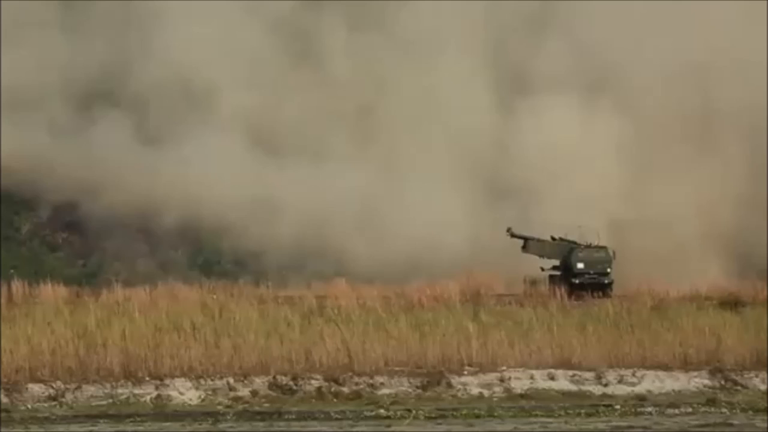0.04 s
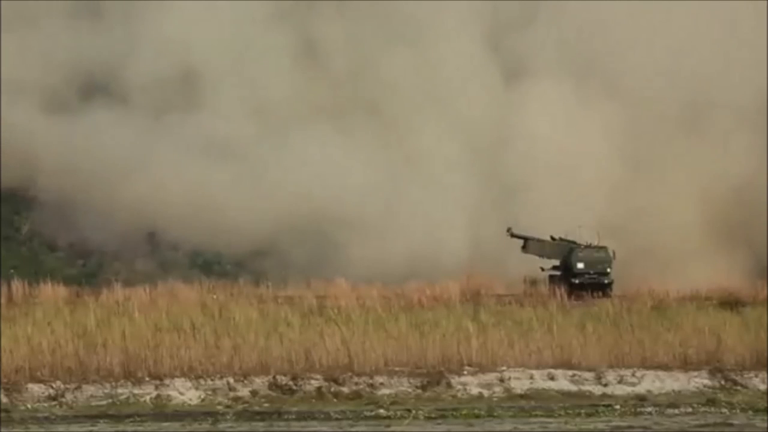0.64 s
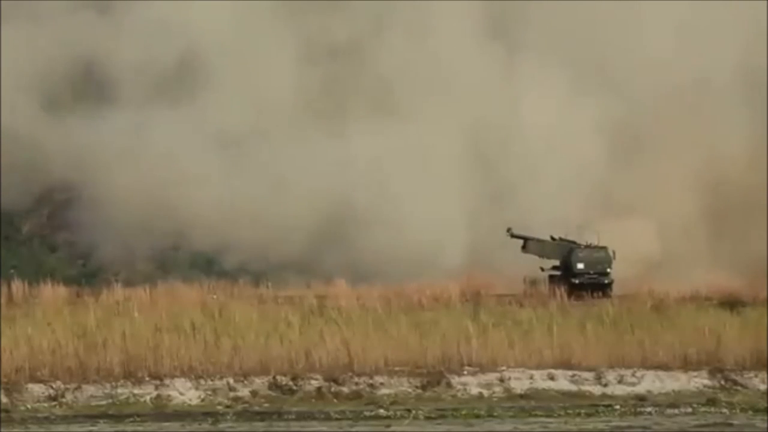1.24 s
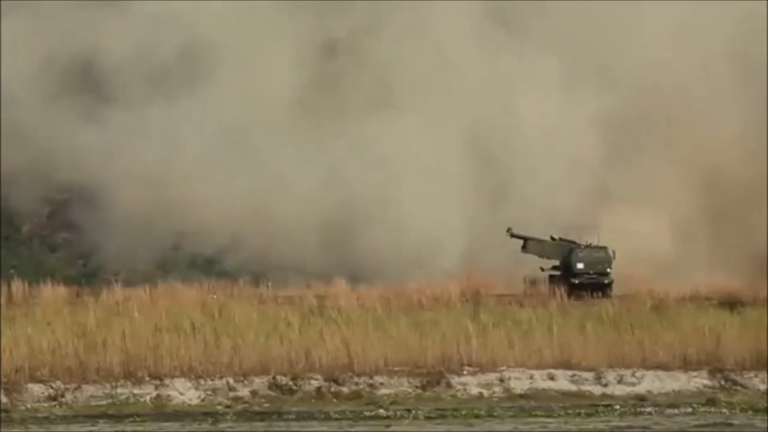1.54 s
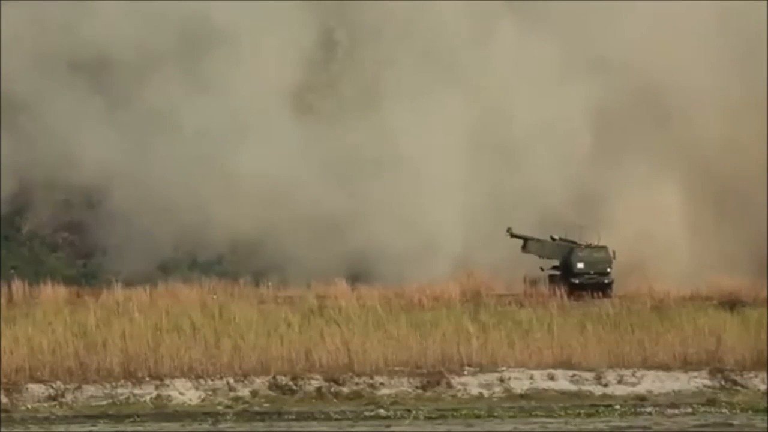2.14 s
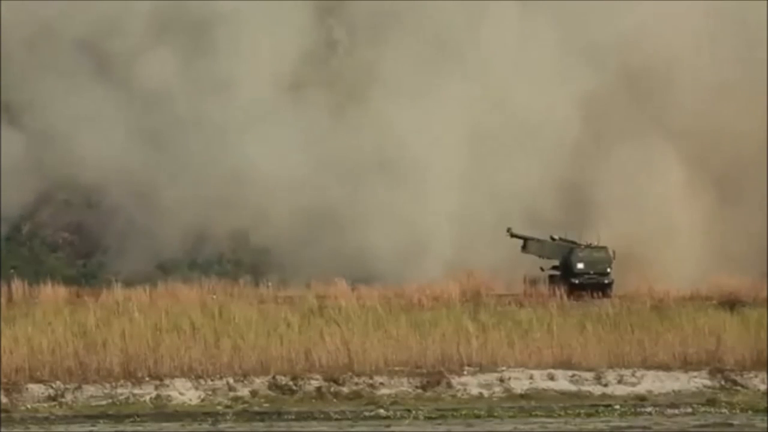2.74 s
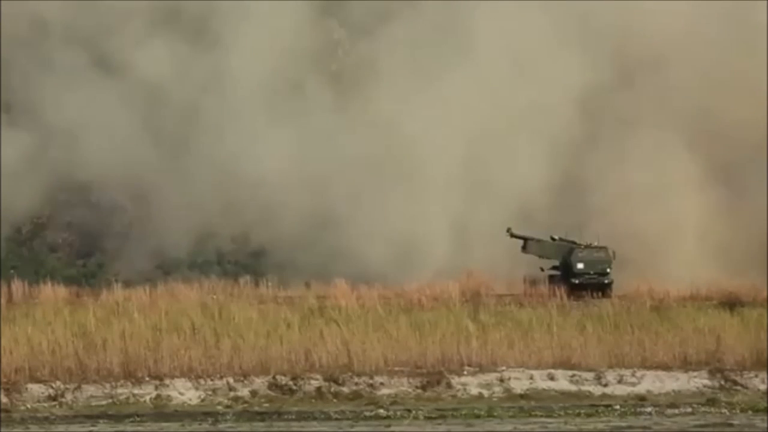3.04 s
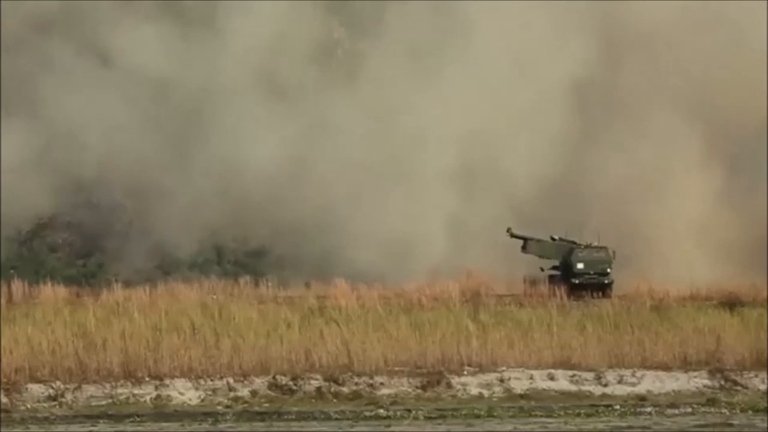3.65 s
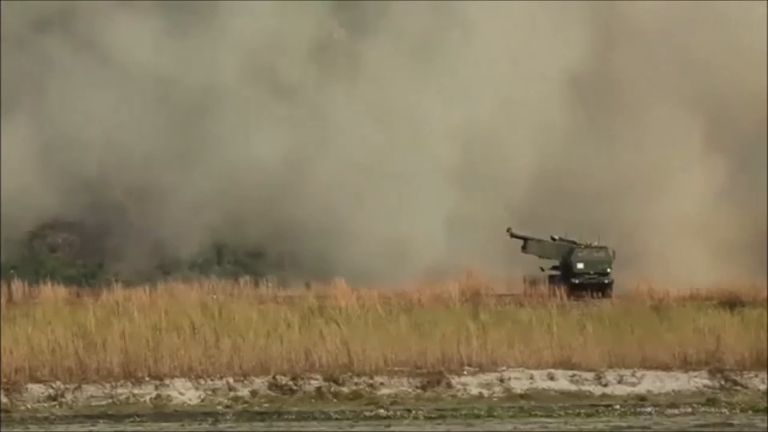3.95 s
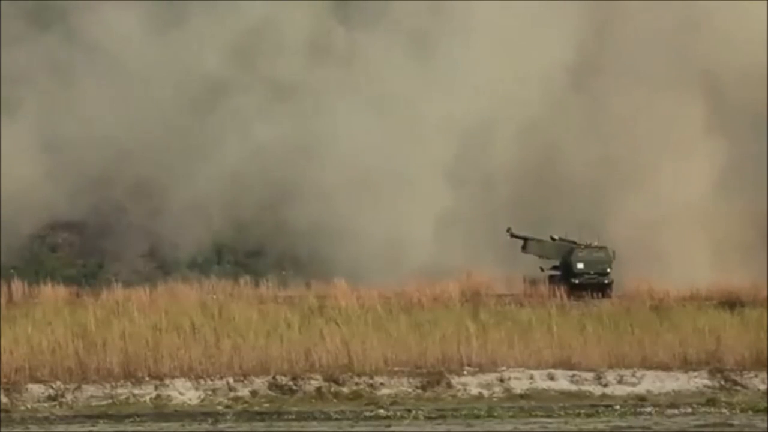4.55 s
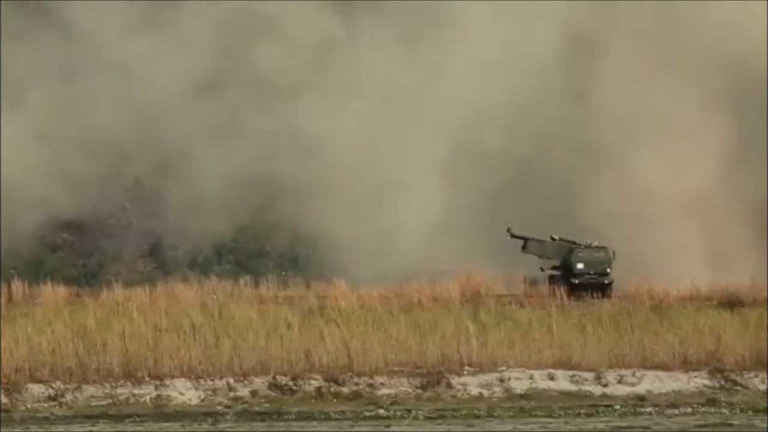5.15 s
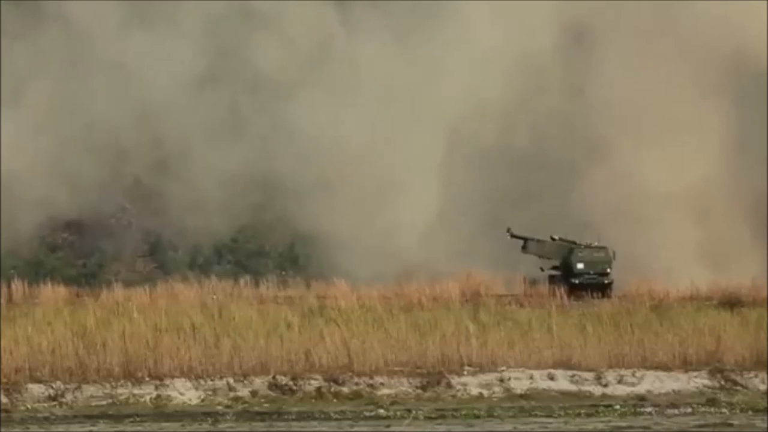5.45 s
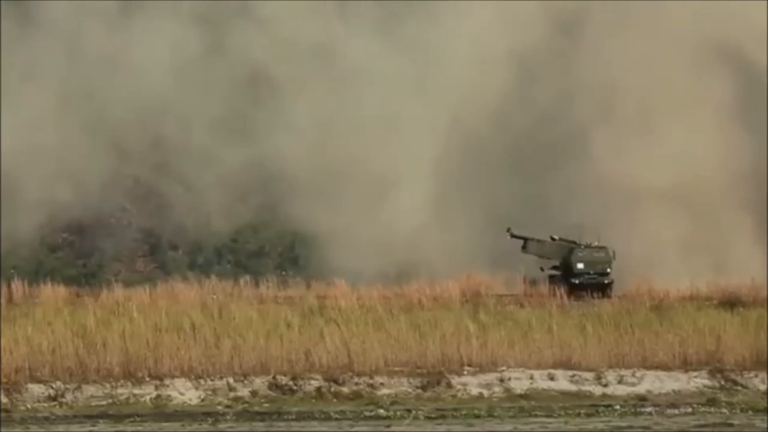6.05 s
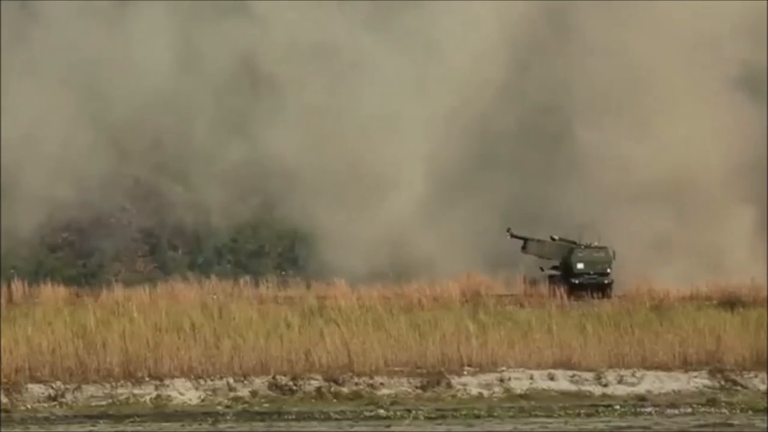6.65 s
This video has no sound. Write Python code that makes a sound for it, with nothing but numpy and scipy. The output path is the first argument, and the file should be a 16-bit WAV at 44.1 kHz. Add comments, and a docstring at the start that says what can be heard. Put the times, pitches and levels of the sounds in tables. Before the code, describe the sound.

A rocket launches with a sudden bang and a loud, crackling roar that dulls and fades over a quiet field.

```python
"""A bang, then a crackling jet roar that overloads the microphone: a truck fires a rocket over a field.
The roar is turbulent noise plus small shocks. As the rocket climbs, its ground reflection sweeps a comb
of resonances downward; distance dulls the roar and it fades in surges.
Beneath it lie the hush of the field, an idling engine and a few faint birds."""
import sys
import numpy as np
from scipy import signal
from scipy.fft import rfft, irfft, next_fast_len
from scipy.io import wavfile
from scipy.ndimage import uniform_filter1d, map_coordinates

SR = 44100
rng = np.random.default_rng(int(sys.argv[2]) if len(sys.argv) > 2 else 0)


def generate_wav(sig):
    """Save sig (samples, or channels by samples) to the path in sys.argv[1] as 16-bit PCM at SR."""
    pcm = np.round(np.clip(np.atleast_2d(sig).T, -1, 1) * 32767).astype(np.int16)
    wavfile.write(sys.argv[1], SR, pcm)


N = 300188
IGNITION_S, FAR_S = .321, 2.3  # FAR_S: time scale from near to far sound

# shock packets carried to the ground by the air: centre t/s, half length/s, treble boost/dB, crackle/dB
SURGES = [(0.367, 0.027, -1, -33), (0.661, .11, 2.5, -51), (1.047, 0.033, 2, -42), (1.683, 0.074, 4.5, -38),
          (1.809, 0.033, 1, -39), (1.934, 0.055, 3, -36.5), (2.06, 0.036, 3, -38.5),
          (2.136, 0.036, 7.5, -38.5), (2.284, 0.031, 6, -45), (2.37, 0.037, 3.5, -36.5),
          (2.447, 0.016, 2.5, -46), (2.528, 0.015, 5.5, -42), (2.576, 0.023, 3.5, -45.5),
          (2.754, 0.04, 14.5, -31), (2.852, 0.043, 7.5, -43), (2.977, 0.036, 9, -37),
          (3.094, 0.015, 4.5, -56), (3.184, 0.033, 5, -36), (3.3, 0.03, 8, -33.5), (3.592, 0.037, 3, -39.5),
          (3.655, 0.013, 2, -50), (3.78, 0.032, 5.5, -46), (3.848, 0.021, 3, -50),
          (3.944, .025, 2.5, -45.5), (4.279, 0.05, 5.5, -34), (4.38, .02, 2.5, -47), (4.52, .02, 3, -48),
          (4.638, 0.04, 5.5, -48)]


def amp(db):
    """Decibels to gain."""
    return 10 ** (np.asarray(db) / 20)


def unit(x):
    """Scale to rms 1."""
    return x / np.sqrt(np.mean(x ** 2) + 1e-20)


def along(points, hz):
    """Interpolate (f/Hz, value) points on a log axis."""
    f, v = np.transpose(points)
    return np.interp(np.log(hz + 1), np.log(f + 1), v)


def curves(rows, t):
    """Each column after the first, interpolated at times t."""
    s, *cols = np.transpose(rows)
    return [np.interp(t, s, c) for c in cols]


def wobble(rate_hz, t):
    """Smooth random curve, rate_hz knots a second."""
    return map_coordinates(rng.standard_normal(4096), [t * rate_hz], mode="wrap")


def filtered(x, response):
    """Apply a zero-phase response(f/Hz)."""
    m = next_fast_len(len(x) + SR // 2)
    return irfft(rfft(x, m) * response(np.fft.rfftfreq(m, 1 / SR)), m)[:len(x)]


def band_noise(centre_hz, half_width_hz, order=2):
    """Noise band at rms 1."""
    white = rng.standard_normal(N)
    return unit(filtered(white, lambda hz: 1 / (1 + ((hz - centre_hz) / half_width_hz) ** order)))


def minimum_phase(x, spectrum, size=4096):
    """Colour x so that its pulses keep a steep front."""
    cepstrum = irfft(np.log(amp(along(spectrum, np.fft.rfftfreq(size, 1 / SR)))))
    cepstrum[1:size // 2] *= 2
    cepstrum[size // 2 + 1:] = 0
    return signal.fftconvolve(x, irfft(np.exp(rfft(cepstrum))))[:N]


def since(start_s):
    """Seconds since start_s per sample, 0 before it."""
    return np.maximum(np.arange(N) / SR - start_s, 0)


def field(hush_db, idle_hz, idle_db):
    """Outdoor hush and the hum of an idling engine."""
    # hush spectrum: f/Hz, relative level/dB
    spectrum = [(15, -40), (25, -26), (80, -17.5), (112, -14.5), (138, -3), (172, -11), (240, -9),
                (475, -11), (529, -10.5), (749, -12.5), (1760, -11.5), (2560, -23), (3010, -27),
                (3260, -31), (6540, -40), (15000, -57)]
    t = np.arange(N) / SR
    hush = unit(filtered(rng.standard_normal(N), lambda hz: amp(along(spectrum, hz))))
    hum = np.sin(2 * np.pi * idle_hz * t + .7 * wobble(4.4, t))
    return amp(hush_db + 0.51 * wobble(9.1, t)) * hush + amp(idle_db + 2 * wobble(5, t)) * hum


def birds(chatter_hz, chatter_db, trill_hz):
    """Narrow-band chatter, raspy chips, and thin whistles and trills that arch in pitch."""
    # chips from the grass: centre t/s, level/dB, half length/s, f/Hz
    chips = [(0.033, -47, 0.011, 1750), (.222, -48, 0.011, 1800), (0.256, -48, 0.01, 1800),
             (5.265, -46, .014, 1740), (5.462, -51, .008, 1920), (5.792, -52, 0.0082, 1850),
             (5.947, -48, .015, 1900), (6.078, -47, .011, 1750), (6.22, -44.5, 0.008, 1760),
             (6.245, -50, .015, 1780), (6.47, -53, .02, 1720), (6.565, -43, 0.006, 1790),
             (6.624, -50.5, .008, 1650), (6.715, -49.5, .014, 1740), (6.783, -48, 0.017, 1680)]
    # calls: t/s, length/s, top of arch f/Hz, level/dB, trill depth/0-1
    whistles = [(0.06, .075, 3080, -59, 0), (0.255, 0.1, 3120, -56, 0.1), (5.19, .15, 3660, -61, 0.7),
                (5.82, 0.18, 3920, -64, 1)]
    t = np.arange(N) / SR
    out = band_noise(chatter_hz, 210, order=4) * amp(chatter_db + 3.8 * wobble(30, t))
    rasp_rad = wobble(560, t)
    for s, db, half_s, hz in chips:
        on = np.abs(t - s) < 4 * half_s
        envelope = amp(db) * np.exp(-((t[on] - s) / half_s) ** 2)
        out[on] += envelope * np.sin(2 * np.pi * hz * t[on] + rasp_rad[on])
    for s, length_s, top_hz, db, depth in whistles:
        on = (t > s) & (t < s + length_s)
        progress = (t[on] - s) / length_s
        trill = depth * np.sin(2 * np.pi * trill_hz * (t[on] - s))
        arch = 1 - .08 * (2 * progress - 1) ** 2
        pitch_hz = top_hz * (arch + .05 * trill + .025 * depth * wobble(120, t[on]))
        envelope = amp(db + 7.7 * (trill - depth)) * np.sin(np.pi * progress)
        out[on] += envelope * np.sin(2 * np.pi * np.cumsum(pitch_hz) / SR)
    return out


def overload_hiss(hiss_db, hiss_hz, hold_s):
    """Even, bright hiss while the loud early roar overloads the microphone."""
    age = since(IGNITION_S)
    return amp(hiss_db) * band_noise(hiss_hz, 6000) * (age > 0) / (1 + (age / hold_s) ** 8)


def ignition(crack_db, crack_s, blast_db, blast_s, boom_db, boom_hz, boom_s):
    """The motor lights: a crack, one blast wave and a short, hollow boom."""
    age = since(IGNITION_S)
    crack = band_noise(1800, 1300) * np.exp(-age / crack_s)
    blast = (age / blast_s - 1) * np.exp(-age / blast_s)
    boom = band_noise(boom_hz, 49) * np.exp(-age / boom_s)
    return (age > 0) * (amp(crack_db) * crack + amp(blast_db) * blast + amp(boom_db) * boom)


def thumps(jet, gap_s, thump_s):
    """Low thumps, each briefly choking the roar in the overloaded microphone."""
    # thumps just after ignition: t/s, level/dB, f/Hz, gap depth/0-1
    hits = [(.38, -19, 170, 0.4), (.463, -11.5, 80, 0.7), (.577, -15, 150, 0.3)]
    for s, db, hz, depth in hits:
        age = since(s)
        gap = depth * (age > 0) * np.exp(-(age / gap_s) ** 4)
        thump = amp(db) * np.sin(2 * np.pi * hz * age) * np.exp(-age / thump_s)
        jet = jet * (1 - gap) + thump
    return jet


def snaps(front_s, decay_s):
    """Lone strong shocks: a steep front, then a swing back."""
    # shocks in the receding roar: t/s, level/dB
    shocks = [(2.961, -14), (2.973, -4)]
    out = np.zeros(N)
    for s, db in shocks:
        age = since(s)
        front = 1 - np.exp(-(age / front_s) ** 2)
        out += amp(db) * front * (age / decay_s - 1) * np.exp(-age / decay_s)
    return out


def receding(s, near, far):
    """Value at time s, moving from near to far; halfway FAR_S after ignition."""
    return far + (near - far) / (1 + (max(s - IGNITION_S, 0) / FAR_S) ** 12)


def swell(t, centre_s, half_s):
    """Surge envelope: abrupt close by, rounded far off."""
    steepness = receding(centre_s, near=7, far=2.8)
    return .5 ** (np.abs((t - centre_s) / half_s) ** steepness)


def crackle(shocks_per_s, log_width, spit_db, spit_hz):
    """Each surge brings shocks that rasp and spit, duller with distance."""
    t = np.arange(N) / SR
    shocks = -rng.uniform(size=N) * (rng.random(N) < shocks_per_s / SR)
    shocks -= shocks.mean()
    out = np.zeros(N)
    for s, half_s, _, db in SURGES:
        on = np.abs(t - s) < 4 * half_s
        centre_hz = receding(s, near=8800, far=1400)
        band = lambda hz: np.exp(-np.log((hz + 1) / centre_hz) ** 2 / (2 * log_width ** 2))
        out[on] += amp(db) * unit(filtered(shocks[on], band)) * swell(t[on], s, half_s)
    return out * amp(spit_db * wobble(spit_hz, t)) * (t > IGNITION_S)


def elevation_deg(t):
    """The rocket leaves low, then settles on its flight path."""
    # climb seen from the microphone: t/s, elevation/deg
    climb = [(.32, 4.68), (.55, 5.72), (.75, 7.3), (.95, 11.1), (1.15, 15.3), (1.4, 17.4), (1.7, 20.9),
             (2, 23.6), (2.6, 25.6), (4.6, 24.9)]
    return curves(climb, t)[0]


def absorption_db(hz, t):
    """Treble loss: to grass while the path is low, to air as the rocket speeds away."""
    age = np.maximum(t - IGNITION_S, 0)
    grass_db = 1.8 * (elevation_deg(0) / elevation_deg(t)) ** 2
    air_db = np.minimum(0.2769 * age ** 1.94, 3.5)
    return (grass_db + air_db) * (hz / 1000) ** 1.3


def ground(hz, t, height_m, strength, rough_hz, grass_hz, soil_hz):
    """Direct sound plus reflection: porous soil lags it, grass and rough ground scatter its treble."""
    sine = np.sin(np.radians(elevation_deg(t)))
    detour_s = 2 * height_m * sine / 343
    soil_rad = 2 * np.arctan(np.sqrt(hz / soil_hz) / sine)
    reflection = strength / (1 + (hz * sine / rough_hz) ** 2 + (hz / grass_hz) ** 4)
    return 1 + reflection * np.exp(-1j * (2 * np.pi * hz * detour_s + soil_rad))


def turbulence_db(hz, t, flutter_hz):
    """Restless air shakes the treble most and fades neighbouring bands at random."""
    # flutter grows with the path, then evens out as paths blend: t/s, share/0-1
    growth = [(.33, 0.14), (1.8, 0.41), (2.9, 0.46), (3.6, 0.43)]
    flutter_db = 2.0 * curves(growth, t)[0] * wobble(flutter_hz, t) * hz / (hz + 800)
    patches = uniform_filter1d(rng.standard_normal((len(hz), len(t))), size=3, axis=0)
    patches = unit(uniform_filter1d(patches, size=36, axis=1))
    depth_db = 1.78 + .6 * np.minimum(t / FAR_S, 1)
    return flutter_db + depth_db * patches


def lopsided(x, skew, threshold, thud):
    """Intense jet noise spikes on one side and is blunt on the other; the tallest peaks thud."""
    excess = np.maximum(np.abs(x) - threshold, 0)
    bass = uniform_filter1d(excess, size=220) - uniform_filter1d(excess, size=2400)
    return x - skew * x * np.tanh(x / threshold) + thud * bass


def exhaust():
    """Turbulent mixing noise and one-sided shocklets."""
    # jet spectrum: f/Hz, relative level/dB
    spectrum = [(20, -43), (60, -16.5), (110, -6), (165, -3), (208, 2.5), (275, -1), (400, 2.5), (600, 1.5),
                (850, 0.4), (1400, -2.2), (2000, -4), (2700, -7.5), (3200, -8), (4500, -12), (7000, -14.5),
                (10000, -22), (15000, -24.5)]
    # shocklets, dense at launch, sparse later: t/s, rate/Hz, level over mixing noise/dB
    shocklets = [(.33, 5000, -5), (1.1, 4000, 1), (2.2, 2600, 2), (2.8, 1500, 2.5), (3.3, 1500, -1),
                 (4.5, 1500, -6)]
    rate_hz, shock_db = curves(shocklets, np.arange(N) / SR)
    shocks = -rng.exponential(size=N) * (rng.random(N) < rate_hz / SR) + rate_hz / SR
    share = amp(shock_db)
    mixed = rng.standard_normal(N) + share * unit(shocks / np.sqrt(rate_hz))
    return unit(minimum_phase(mixed / np.sqrt(1 + share ** 2), spectrum))


def roar(start_s, rise_s, rumble_hz, bright_hz, surge_hz, fade_db_per_s):
    """The exhaust heard through air and over ground: surges brighten it, distance dulls it."""
    # roar between surges: t/s, level/dB, rumble/dB, treble tilt/(dB per octave)
    contour = [(.326, -15.5, -21, 7), (.36, -8, -4, 5.5), (.47, -11.5, -7, 5.5), (.58, -9, -4, 3),
               (.68, -6, -14, 2), (.85, -6, -6.5, 1.7), (.98, -4.5, -7, 0.5), (1.17, -4, -4, 0.03),
               (1.47, -3, -3, 0.74), (1.55, -6.5, 5.5, -0.2), (1.78, -7.5, 1.5, -0.7), (1.86, -10, -2, 0.1),
               (1.91, -6.5, -2, -2), (2.0, -11.5, 4, -0.5), (2.03, -6, -1.5, -2.5), (2.15, -8.5, -7, -3),
               (2.2, -12.5, 2.5, -1.5), (2.3, -11.5, 1, -1), (2.41, -6.5, -4.5, -3), (2.5, -11.5, -4, -2),
               (2.54, -10.5, -1, -2.5), (2.6, -13, -4, -2), (2.66, -18, 6, -1.5), (2.8, -15.5, -3.5, -3),
               (2.98, -14, -6, -4.5), (3.1, -25, 7.5, 0.2), (3.22, -28, 0, -0.5), (3.27, -23.5, -2, -1),
               (3.46, -32, 2.5, 1.5), (3.8, -29.5, -0.5, 0.5), (3.92, -31.5, -8, 2.5), (4.15, -30.5, -6, 3),
               (4.6, -31, -8.5, 0), (4.92, -39, -4, 0.8), (5.12, -38, -2, -0.3), (5.3, -46.5, -2.5, 4),
               (5.7, -52.5, 0.5, 4.5)]
    hz, t, spectra = signal.stft(exhaust(), SR, nperseg=512, noverlap=384)
    hz = hz[:, None]
    level_db, rumble_db, tilt_db = curves(contour, t)
    level_db -= fade_db_per_s * np.maximum(t - contour[-1][0], 0)
    surge_db = sum(db * swell(t, s, half_s) for s, half_s, db, _ in SURGES)
    treble = hz ** 2 / (hz ** 2 + surge_hz ** 2)
    octaves = np.log2(1 + (hz / bright_hz) ** 2) / 2
    colour_db = rumble_db / (1 + (hz / rumble_hz) ** 4) + tilt_db * octaves - absorption_db(hz, t)
    gain = amp(level_db + surge_db * treble + colour_db + turbulence_db(hz, t, flutter_hz=55))
    comb = ground(hz, t, height_m=0.575, strength=0.42, rough_hz=1050, grass_hz=2400, soil_hz=19400)
    sound = signal.istft(spectra * gain * comb, SR, nperseg=512, noverlap=384)[1][:N]
    return sound * np.minimum(since(start_s) / rise_s, 1)


def scene():
    """Rocket, birds and field at one microphone."""
    jet = roar(start_s=.3255, rise_s=0.001, rumble_hz=263.7, bright_hz=849, surge_hz=1105,
               fade_db_per_s=15.5)
    rocket = lopsided(jet, skew=0.081, threshold=0.44, thud=0.37)
    rocket += crackle(shocks_per_s=1600, log_width=0.45, spit_db=1.0, spit_hz=120)
    rocket = thumps(rocket, gap_s=0.004, thump_s=.022)
    rocket += snaps(front_s=.00009, decay_s=0.00037)
    rocket += ignition(crack_db=-3.5, crack_s=0.0012, blast_db=-4.5, blast_s=0.00083,
                       boom_db=-17, boom_hz=191, boom_s=.16)
    rocket += overload_hiss(hiss_db=-35, hiss_hz=9000, hold_s=1.215)
    background = birds(chatter_hz=1740, chatter_db=-67, trill_hz=62.7)
    background += field(hush_db=-52.0, idle_hz=143, idle_db=-68.5)
    mono = rocket + background
    return np.array([mono, mono])


def record(dry):
    """The microphone amplifier rounds off the loudest peaks; the recorder limits the band."""
    ceiling, knee, top_hz = .76, 3.6, 15200
    overloaded = dry / (1 + np.abs(dry / ceiling) ** knee) ** (1 / knee)
    return np.array([filtered(ch, lambda hz: 1 / (1 + (hz / top_hz) ** 200)) for ch in overloaded])


dry = scene()
out = record(dry)
generate_wav(out)
```